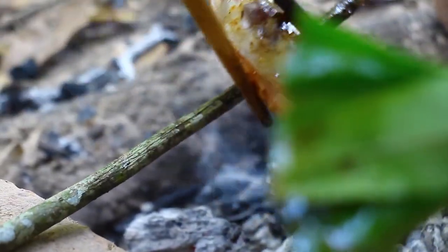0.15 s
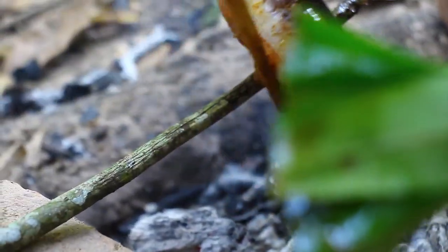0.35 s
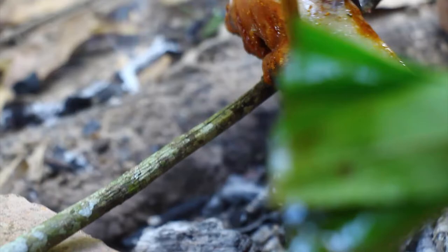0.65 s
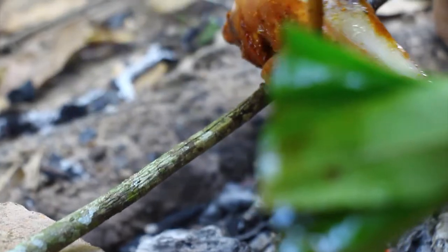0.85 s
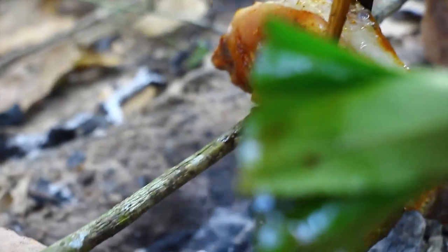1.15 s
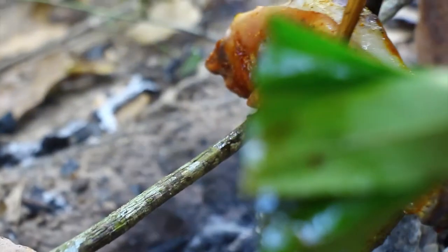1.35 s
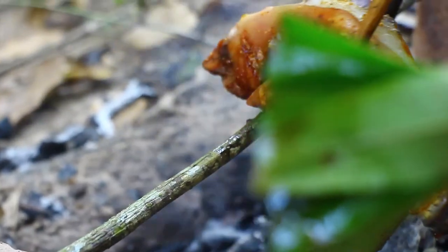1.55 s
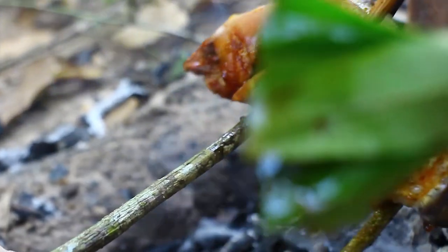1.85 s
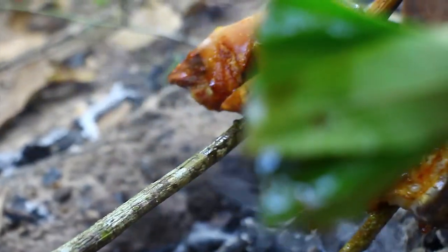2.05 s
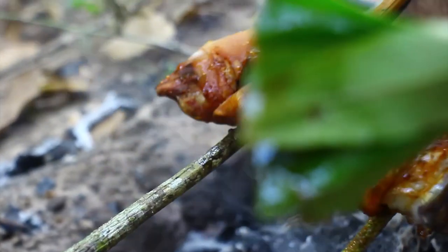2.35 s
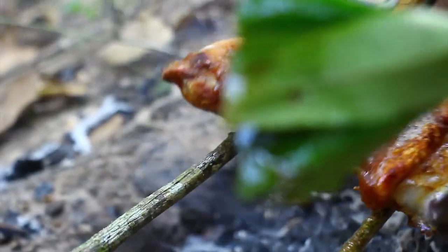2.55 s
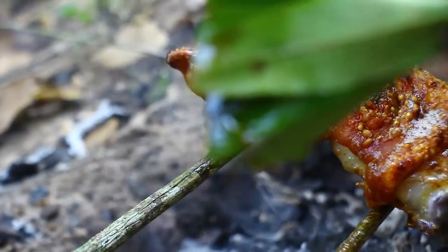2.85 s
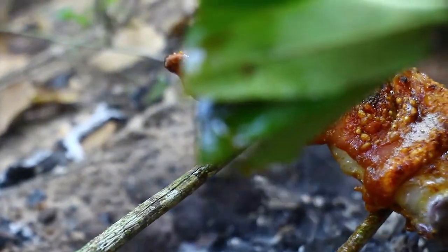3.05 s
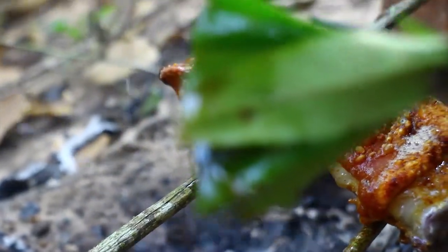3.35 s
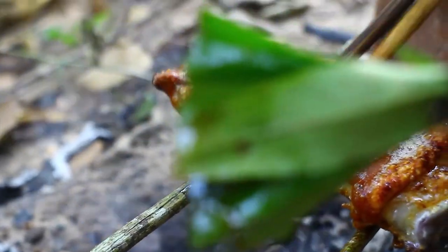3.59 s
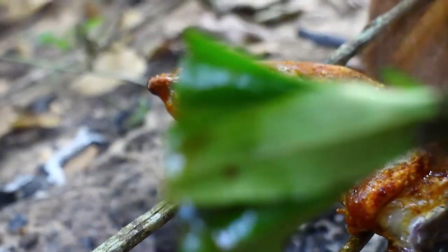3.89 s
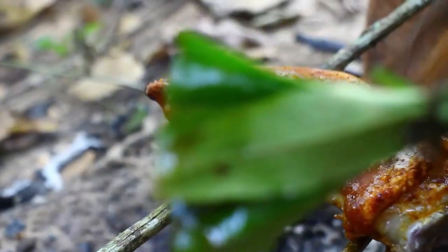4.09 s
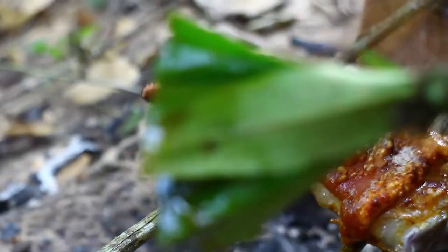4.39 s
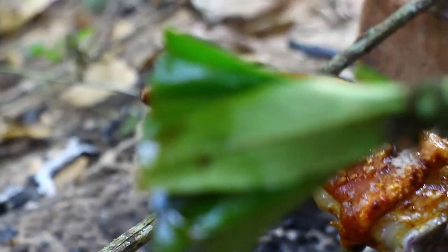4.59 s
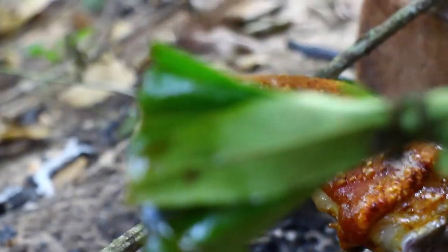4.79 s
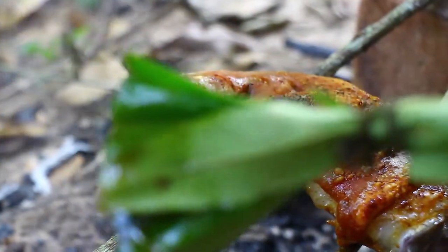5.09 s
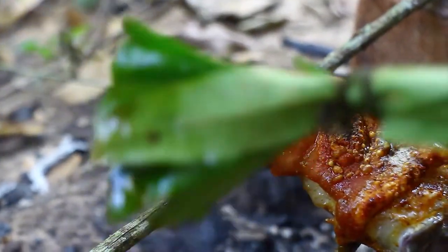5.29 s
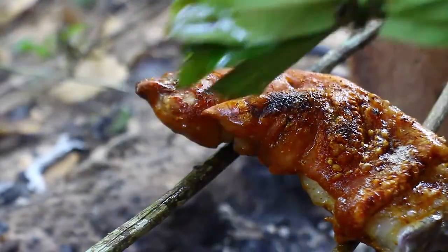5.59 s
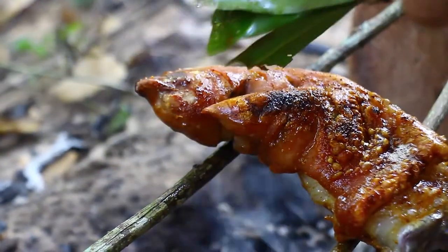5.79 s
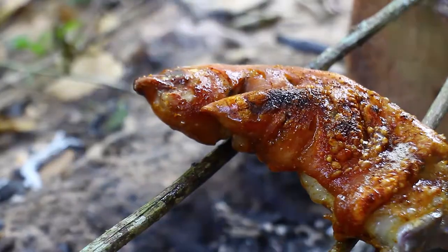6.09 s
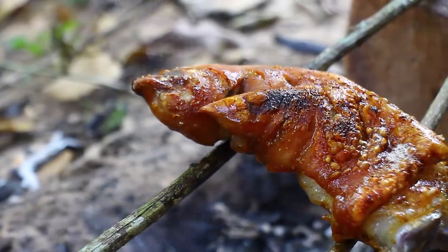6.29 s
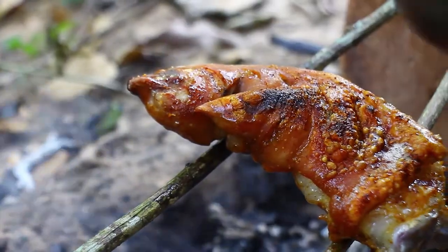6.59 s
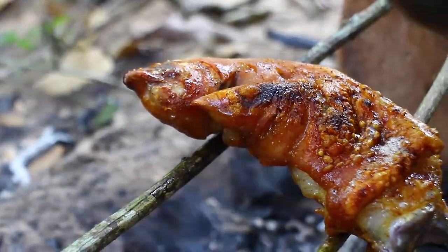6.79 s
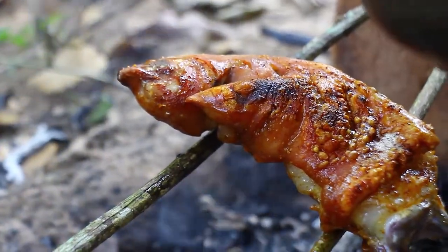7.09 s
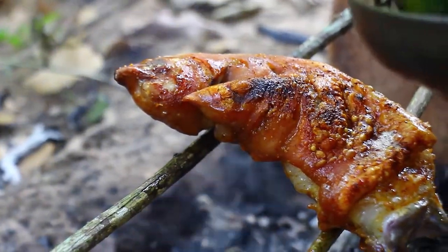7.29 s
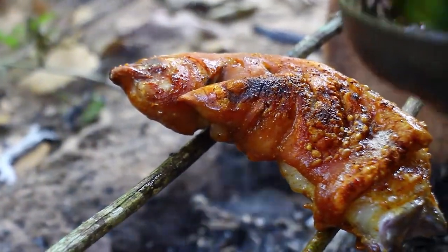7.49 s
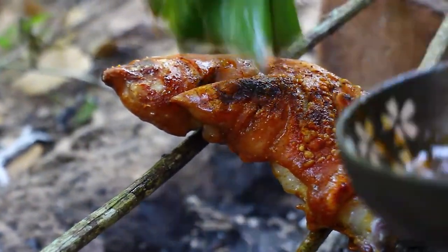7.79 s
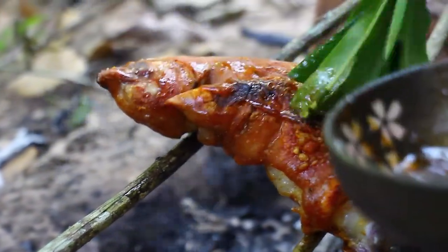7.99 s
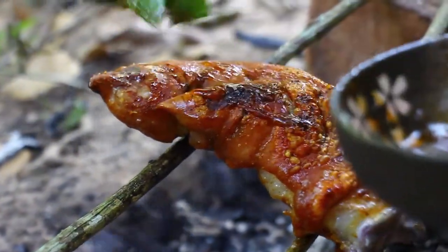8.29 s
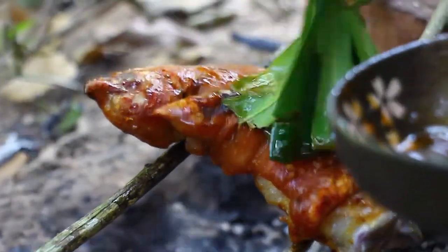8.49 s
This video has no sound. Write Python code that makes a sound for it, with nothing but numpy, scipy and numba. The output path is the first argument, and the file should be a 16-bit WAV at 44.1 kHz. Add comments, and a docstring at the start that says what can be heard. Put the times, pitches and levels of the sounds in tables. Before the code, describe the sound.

Close outdoor roasting: spitting fat and crackling embers, a cluster of sharp wooden knocks, a bowl tick, brief steam squeal, and wet leaf brushing.

```python
"""In a forest, meat sizzles on green sticks over wood embers, close to a small microphone.
Fat and sauce boil off as noise in spitting puffs; bubbles and embers crackle as rings and sprays of hiss.
Steam whistles twice through a crack as wavering tones; wet leaves brush the skin and stir the sauce bowl as
shaped noise. Wooden tongs knock a stick and a bowl, each a set of dying tones; soft, dull thumps go with the
handling and one knock. Underneath lies a soft noise bed of fire and forest."""
import sys
import numpy as np
from scipy import signal
from scipy.fft import rfft, irfft, next_fast_len
from scipy.io import wavfile
from scipy.ndimage import uniform_filter1d, map_coordinates
from numba import njit

SR = 44100
rng = np.random.default_rng(int(sys.argv[2]) if len(sys.argv) > 2 else 0)


def persist_wave(psi):
    """Save psi, clipped to +-1, as 16-bit WAV."""
    counts = np.round(np.clip(psi, -1, 1) * 32767).astype(np.int16)
    wavfile.write(sys.argv[1], SR, np.atleast_2d(counts).T)


N = 381465


def undb(db):
    """Turn decibels into a plain multiplier."""
    return 10 ** (np.asarray(db) / 20)


def level(x, db):
    """Scale a signal to an average (RMS) level."""
    return x * undb(db) / np.sqrt(np.mean(x ** 2))


def curve(s, v):
    """Draw straight lines between values v at times s, one point per sample."""
    return np.interp(np.arange(N) / SR, s, v)


def colour(x, table):
    """Shape a signal by (pitch_hz, level_db) points; white noise keeps its level."""
    hz, db = np.transpose(table)
    size = next_fast_len(N)
    f = np.maximum(np.arange(size // 2 + 1) * SR / size, 1)
    gain = level(undb(np.interp(np.log(f), np.log(hz), db)), 0)
    return irfft(rfft(x, size) * gain, size)[:N]


def walk(rate):
    """Random levels, each held for about 1 / rate seconds, then smoothed twice; their spread is near 1."""
    k = max(int(SR / rate), 2)
    steps = np.repeat(rng.standard_normal(N // k + 1), k)
    return 1.32 * uniform_filter1d(uniform_filter1d(steps, k), k)[:N]


@njit
def grains(n, start, step, fade, size):
    """Add up dying sine waves, each run until it has dropped by 60 dB."""
    y = np.zeros(n)
    for k in range(len(start)):
        turn = fade[k] * np.exp(1j * step[k])
        z = size[k] + 0j
        length = int(-np.log(1000) / np.log(fade[k]))
        for i in range(start[k], min(n, start[k] + length)):
            y[i] += z.imag
            z *= turn
    return y


def pop(s, db, hz, cycles, sign):
    """Dying rings, as of bursting bubbles: each drops by 60 dB in three times its cycle count."""
    hz = np.clip(hz, 100, .4 * SR)
    fade = np.exp(-np.log(1000) * hz / (3 * np.clip(cycles, .3, 30) * SR))
    start = np.clip(s * SR, 0, N - 1).astype(np.int64)
    return grains(N, start, 2 * np.pi * hz / SR, fade, sign * undb(db))


def tail(x, ms):
    """Envelope that jumps with each spike and dies away, to 37 % in the given time."""
    return signal.lfilter([1], [1, -np.exp(-1000 / (ms * SR))], x)


def puffs(count, spread_db, ms):
    """Sudden starts that die quickly; a few are larger than the rest, or smaller if the spread is negative."""
    u = rng.random((count, 2))
    size_db = spread_db * np.minimum(-np.log(1 - u[:, 1]), 3.5)
    spikes = np.bincount((u[:, 0] * N).astype(int), undb(size_db), N)
    return level(tail(spikes, ms), 0)


# Boiling over time: start_s, steam_db, top_db (fine top hiss)
BOIL = [(0.0, -46, -66), (0.35, -49.5, -53.5), (0.74, -41.5, -69), (1.25, -46.5, -59), (1.658, -50, -60),
        (2.65, -47.5, -64), (2.82, -43.5, -69), (3.09, -45, -51), (3.17, -50.5, -59), (3.35, -51, -81),
        (3.64, -48, -54), (3.81, -40, -53), (4.14, -52, -64), (6.17, -51.5, -66), (6.36, -53, -48.5),
        (6.72, -53, -62), (7.13, -46.5, -57), (7.78, -53, -75), (8.17, -49, -68), (8.31, -51.5, -72),
        (8.65, -61, -56)]
# Tone of the steam: pitch_hz, level_db (per Hz, relative)
STEAM = [(710, -34), (1200, -41), (1800, 3), (2090, -15), (2790, -3.5), (3270, -2.5), (3580, -3), (5140, 1),
         (11000, -11.5), (14300, -19.5), (22000, -120)]
# Tone of the low, wet splutter: pitch_hz, level_db (per Hz, relative)
SPLUTTER = [(88, -29), (150, -10), (368, -9.5), (631, -2.5), (925, -5), (1740, -4), (2090, -6.5),
            (3500, -11), (4550, -44), (7700, -120)]
# Tone of the fine top hiss: pitch_hz, level_db (per Hz, relative)
TOP = [(5000, -4), (8500, 3), (11000, -1), (14500, 0), (15500, -5), (16500, -18)]
# Tone of the scratchy surges: pitch_hz, level_db (per Hz, relative)
SCRATCH = [(880, -28), (1500, -9), (1860, 3), (2110, -26), (2400, -0.5), (4200, 1.5), (6000, -2),
           (9200, -9), (10500, -33), (22000, -120)]
# The splutter rises by a share of each dB of steam above its usual level
SPLUTTER_DB, SPLUTTER_FOLLOWS, USUAL_STEAM_DB = -51.5, 0.55, -46.5
SURGE_TOP_DB = -12  # top hiss of a surge, against its steam


def sizzle():
    """Steam, splutter and top hiss share the same spits; surges are a denser scratch; bubbles burst in both."""
    s, steam_db, top_db = np.transpose(BOIL)
    splutter_db = SPLUTTER_DB + SPLUTTER_FOLLOWS * (steam_db - USUAL_STEAM_DB)
    steam, splutter, top = (undb(curve(s, db)) for db in (steam_db, splutter_db, top_db))
    sweep, wet = surge()
    spray = sweep * undb(SURGE_TOP_DB)

    # steady boiling plus long and short spits
    long_spits = puffs(count=900, spread_db=3.0, ms=4.6)
    short_spits = puffs(count=2200, spread_db=5.0, ms=0.5)
    spit = level(0.53 + 0.42 * long_spits + 0.55 * short_spits, 0)
    rough = level(0.5 + 0.36 * puffs(count=2500, spread_db=5.0, ms=3.0), 0)

    layers = (
        (steam * spit, STEAM),
        (sweep * rough, SCRATCH),
        (np.hypot(splutter * spit, wet * rough), SPLUTTER),
        (np.hypot(top * spit, spray * rough), TOP),
    )
    out = 0
    for gain, tone in layers:
        flicker = undb(1.2 * walk(30))
        out = out + colour(rng.standard_normal(N) * gain * flicker, tone)
    return out + np.hypot(steam, sweep) * bubbles()


def bubbles():
    """Many small bubbles: fizz rings very briefly, and quieter blubs ring longer."""
    u = rng.random((2, 2600, 5)).transpose(0, 2, 1)  # per kind: time, size, pitch, ring length, sign
    size_db = np.minimum(-4.2 * np.log(1 - u[:, 1]), 11.5)
    at, sign = u[:, 0] * N / SR, np.sign(u[:, 4] - .5)
    fizz = pop(at[0], size_db[0] + 8.5, 1300 * 8 ** u[0, 2], 0.22 + 0.83 * u[0, 3], sign[0])
    blubs = pop(at[1], size_db[1] - 10, 800 * 10 ** u[1, 2], 3 + 9 * u[1, 3], sign[1])
    return fizz + blubs


# Surges as sauce hits the heat or wet leaves sweep the skin:
# start_s, swell_s, hold_s, fall_s, steam_db, wet_db (splutter, above the steam)
SURGES = [(0.446, 0.16, 0.08, .4, -47.5, -13), (3.648, 0.017, 0.094, 0.018, -45, 0),
          (3.844, 0.02, 0.19, 0.013, -50.5, 4), (4.559, 0.057, 0.016, 0.049, -37, -0.5),
          (5.286, 0.0053, 0.022, 0.01, -36.5, -0.5), (5.318, 0.016, 0.02, .025, -50.5, 3),
          (5.718, 0.015, 0.013, .01, -54, 5.5), (6.171, 0.0053, 0.016, 0.011, -53, -18),
          (6.412, 0.054, 0.0097, 0.0083, -45.5, -3), (6.586, 0.016, 0.036, 0.014, -47.5, -25),
          (6.842, 0.028, 0.011, 0.0075, -41.5, -18), (7.031, 0.0088, 0.12, .012, -50.5, 0.5),
          (7.177, 0.017, 0.084, .025, -47.5, 0.5), (7.923, 0.014, 0.064, 0.04, -43, -7),
          (7.97, 0.055, 0.042, .008, -40.5, -18), (8.161, 0.044, 0.025, .03, -40.5, -8.5),
          (8.214, 0.03, 0.046, 0.015, -36.5, -2.5), (8.529, 0.013, 0.048, 0.014, -43.5, -4),
          (8.596, 0.044, .04, .012, -42.5, -11)]


def surge():
    """Steam and splutter levels of all surges: each swells, holds and falls away; their powers add."""
    power = 0
    for s, swell, hold, fall, db, wet_db in SURGES:
        shape = curve(s + np.cumsum([0, swell, hold, fall]), [0, 1, 1, 0]) ** 2
        peak_power = undb(2 * np.array([[db], [db + wet_db]]))
        power = power + peak_power * shape
    return np.sqrt(power)


# Crackles, two of them long-ringing, faint chirps:
# start_s, level_db (before the ring and spray offsets), pitch_hz, ring_cycles
CRACKLES = [(0.175, -26, 4400, 2.2), (0.191, -21, 4250, 3), (0.269, -29, 1770, 2.4),
            (0.298, -21, 1240, 1.1), (0.422, -20.5, 3320, 2.4), (0.515, -22, 5000, 2),
            (0.602, -15, 3380, 1.9), (0.682, -11, 5160, 2), (0.728, -18, 4550, 2), (0.814, -20, 2970, 1.1),
            (0.848, -19, 1760, 1.1), (0.871, -17.5, 4650, 1.5), (0.991, -23.5, 2980, 3.6),
            (1.036, -21.5, 1820, 3.1), (1.046, -21, 5540, 1.5), (1.14, -20.5, 5570, 2.4),
            (1.289, -25, 5630, 2.9), (1.367, -28, 1650, 3.5), (1.447, -36, 1840, 1.1), (1.47, -23, 6500, 2),
            (1.495, -16.5, 4580, 1.2), (1.55, -23, 3600, 2.2), (1.641, -24, 6000, 2.2),
            (1.667, -19, 5500, 1.7), (1.707, -18, 1870, 1.2), (1.805, -25, 8000, 2.7),
            (1.834, -24.5, 4710, 1.9), (1.853, -18, 6500, 2), (1.862, -24, 6000, 2), (1.89, -19, 1050, 1.3),
            (1.899, -19, 5000, 1), (1.909, -23, 7000, 2), (1.934, -23, 5500, 1.5), (1.95, -20.5, 1700, 1.3),
            (1.96, -21, 6500, 2), (2.049, -21, 1560, 1.4), (2.071, -16.5, 5810, 3.9),
            (2.213, -21.5, 4000, 1.6), (2.328, -25, 1100, 1.5), (2.373, -17, 6640, 5.6),
            (2.517, -21, 5670, 2.4), (2.424, -19.5, 7000, 2.9), (2.836, -22, 1160, 7.6),
            (2.922, -34, 4500, 1.5), (3.136, -25.5, 800, 5.8), (3.205, -19, 3000, 1.3),
            (3.28, -22, 6650, 2.6), (3.315, -25, 1370, 0.91), (3.424, -18, 1220, 0.75),
            (3.815, -18, 1890, 1.6), (3.88, -17.5, 1770, 4.3), (3.553, -32, 7040, 2),
            (4.293, -23, 6080, 2.4), (4.354, -26, 3060, 2.4), (4.367, -14.5, 3100, 0.68),
            (4.446, -16, 5330, 2.4), (4.463, -23, 1620, 3.8), (4.71, -29, 5500, 2.7),
            (4.748, -18.5, 4520, 1), (4.909, -16, 1830, 1), (4.963, -21, 4970, 2.7),
            (4.978, -22, 6500, 2.4), (5.018, -27, 918, 0.32), (5.168, -25, 6500, 2.8),
            (5.215, -20.5, 6170, 4.5), (5.222, -18, 6350, 3.2), (5.291, -21.5, 1710, 9.4),
            (5.433, -30, 1210, 3.3), (5.447, -16, 960, 5), (5.503, -26, 5000, 1.7), (5.548, -30, 4990, 2.4),
            (5.615, -20.5, 5780, 2.6), (5.68, -26, 8000, 2), (5.743, -23, 9000, 2.2), (5.769, -30, 9000, 2),
            (5.79, -36, 4500, 1.5), (5.9025, -16.5, 9050, 2.7), (5.906, -28, 4600, 1.8),
            (5.935, -20.5, 3900, 1.4), (6.061, -21.5, 1660, 1.8), (6.087, -34.5, 2720, 27),
            (6.179, -29, 5270, 30), (6.215, -22, 3000, 0.96), (6.334, -22, 3060, 3.1),
            (6.344, -20, 5140, 2.4), (6.376, -21.5, 1560, 3.7), (6.421, -12.5, 926, 0.38),
            (6.444, -13.5, 2600, 1), (6.531, -21.5, 4730, 4.1), (6.607, -20, 6440, 6),
            (6.636, -22.5, 9000, 2), (6.835, -26.5, 915, 2.6), (7.043, -23.5, 1210, 6.4),
            (7.22, -25, 600, 2.6), (7.437, -18.5, 3240, 4.2), (7.533, -29, 3940, 18), (7.6, -14.5, 1490, 1),
            (7.708, -20, 1750, 2.2), (7.84, -19.5, 7000, 1.5), (7.937, -23.5, 1500, 4.2),
            (8.049, -21, 4390, 5.6), (8.068, -18, 4620, 2.9), (8.079, -14.5, 3860, 3.1),
            (8.101, -19, 5500, 2), (8.308, -19, 3240, 6.3), (8.397, -26, 9000, 1),
            (8.457, -27.5, 8900, 2.1), (8.472, -25, 7100, 1.5), (8.549, -20.5, 1330, 1.3)]
RING_DB, SPRAY_DB, SPRAY_MS = -4, -12.5, 1.64
# Low crackles spray mostly dull splutter, high ones bright hiss
DULL_HZ, BRIGHT_HZ, SPRAY_TOP_DB = 1160, 4370, -14


def crackles():
    """Each crackle: a ring, mostly short, and a spray of hiss, brighter for higher ones; two are faint chirps."""
    s, db, hz, cycles = np.transpose(CRACKLES)
    sign = rng.choice([-1., 1.], len(s))
    bright = np.clip(np.log(hz / DULL_HZ) / np.log(BRIGHT_HZ / DULL_HZ), 0.25, 1)

    def spray(share):
        """Burst envelopes for one share of the spray."""
        spikes = np.bincount((s * SR).astype(int), share * undb(db + SPRAY_DB), N)
        return tail(spikes, SPRAY_MS)

    hiss = colour(rng.standard_normal(N), STEAM)
    hiss = hiss + undb(SPRAY_TOP_DB) * colour(rng.standard_normal(N), TOP)
    dull = undb(1) * colour(rng.standard_normal(N), SPLUTTER)
    rings = pop(s, db + RING_DB, hz, cycles, sign)
    return rings + spray(bright) * hiss + spray(1 - bright) * dull


# The sizzle also comes back off the broad leaf held beside the meat:
# start_s, extra_path_m, share (of the direct sound, 0-1)
LEAF_ECHO = [(0, 0.46, 0.054), (.7, 0.47, 0.16), (2.9, 0.414, 0.04), (8.65, 0.44, 0.055)]


def echo(x):
    """Add the copy that took the longer way at 343 m/s, keeping the power about the same."""
    s, metres, share = np.transpose(LEAF_ECHO)
    delay = curve(s, metres) / 343 * SR  # in samples
    late = map_coordinates(x, [np.arange(N) - delay], mode="mirror")
    loudness = curve(s, share)
    return (x + loudness * late) / np.hypot(1, loudness)


# Knocks of the tongs, most with a bounce:
# start_s, peak_db (of the ring), bowl_share (0-1), pitch_hz (favoured by the place of the blow)
KNOCKS = [(3.3745, -19, .9, 4170), (3.6458, -12, .25, 2980), (3.6519, -7.5, 0, 1850),
          (3.8446, -5, .03, 1200), (3.8471, -6, .1, 2700), (4.0392, -1.5, .02, 1850),
          (4.0465, -21, .02, 1850), (4.2273, -23, 0, 600), (4.2279, -14, .03, 1850),
          (4.2284, -11, .03, 1850), (4.4099, -6, .03, 2700), (4.4107, 0, .03, 1200),
          (4.4225, -25, .03, 1200), (4.7879, -17, .1, 5870), (4.78858, -14, .1, 4150),
          (4.78925, -15, .1, 4150), (4.7899, -15, 0, 600), (5.3992, -28, .6, 4170), (5.4069, -4, 1, 7500),
          (5.40722, -6, 1, 4170)]
# Tones of the wooden stick: pitch_hz, level_db (relative), t60_s (time to drop by 60 dB)
STICK = [(240, 10, .025), (600, -3, .022), (1160, -3, .010), (1500, -8, .006), (1820, -4, .010),
         (2400, -2, .005), (2980, -3, .008), (3540, -7, .006), (4150, -5, .006), (4800, -10, .004),
         (5870, -10, .013), (7800, -11, .007), (12200, -20, .003)]
# Tones of the bowl: pitch_hz, level_db (relative), t60_s (time to drop by 60 dB)
BOWL = [(1755, -16, .012), (3042, -8, .024), (4170, -5, .008), (5620, -12, .010), (6300, -1, .006),
        (7200, -2, .004), (8400, -2, .006), (10050, -13, .008), (12800, -5, .004)]
STICK_CONTACT_MS, BOWL_CONTACT_MS = 0.12, .04  # the harder bowl throws the tongs off sooner
FAVOUR_DB, FAVOUR_OCTAVES = 6, .22  # boost near the favoured pitch, and how far it reaches


def knocks():
    """Each blow pushes stick and bowl with a pulse set by the contact time; grit rattles after it."""
    out, spikes = np.zeros(N), np.zeros((2, N))
    t = np.arange(SR // 20) / SR
    thin = signal.butter(3, 1000, "high", fs=SR, output="sos")  # thin wood gives off little bass
    for s, db, bowl, favoured_hz in KNOCKS:
        i, ring = int(s * SR), 0
        for share, modes in ((1 - bowl, STICK), (bowl, BOWL)):
            hz, mode_db, t60 = np.transpose(modes)[:, :, None]
            spot = rng.standard_normal((2, len(modes), 1))  # the place of the blow shifts each tone a little
            wave = np.sin(2 * np.pi * hz * (1 + .012 * spot[0]) * t) * np.exp(-np.log(1000) * t / t60)
            nearness = np.exp(-(np.log2(hz / favoured_hz) / FAVOUR_OCTAVES) ** 2)
            mode_db = mode_db + FAVOUR_DB * nearness + 1.5 * spot[1]
            ring = ring + share * (undb(mode_db) * wave).sum(axis=0)
        contact_ms = (1 - bowl) * STICK_CONTACT_MS + bowl * BOWL_CONTACT_MS
        pulse = np.hanning(int(contact_ms * SR / 1000) + 3)
        ring = signal.sosfilt(thin, np.convolve(ring, pulse)[:len(t)])
        out[i:i + len(t)] += undb(db) * ring / np.abs(ring).max()
        spikes[:, i] = undb(db) * np.array([1 - bowl, 1])  # grit lies on the stick

    grit_band = signal.butter(2, [700, 5000], "band", fs=SR, output="sos")
    crack_band = signal.butter(2, [5000, 11000], "band", fs=SR, output="sos")
    grit = signal.sosfilt(grit_band, rng.standard_normal(N)) * tail(spikes[0], 2.95)
    crack = signal.sosfilt(crack_band, rng.standard_normal(N)) * tail(spikes[1], 0.99)
    return out + undb(-11.5) * grit + undb(-24.5) * crack


# Two steam whistles, each a list of: start_s, pitch_hz, level_db, waver (share of pitch)
WHISTLES = [
    [(1.93, 4550, -56, .001), (2.11, 4090, -57, .001), (2.2, 4010, -55, .001), (2.5, 3940, -55, .001),
     (2.76, 3890, -57, .002)],
    [(5.51, 4350, -52, .003), (5.537, 4950, -46, .015), (5.58, 5150, -50, .03), (5.622, 5800, -45, .035),
     (5.645, 6400, -47, .08), (5.66, 5900, -46, .15), (5.76, 5700, -56, .18)],
]


def whistles():
    """Steam forced through a crack: a tone that breaks into hiss as its pitch wavers more."""
    out = 0
    for table in WHISTLES:
        s, hz, db, waver = np.transpose(table)
        gate = curve([s[0] - .015, s[0], s[-1], s[-1] + 0.015], [0, 1, 1, 0])
        pitch = curve(s, hz) * (1 + curve(s, waver) * walk(3500))
        tone = np.sin(2 * np.pi * np.cumsum(pitch) / SR)
        out = out + gate * undb(curve(s, db) + 1.3 * walk(60)) * tone
    return out


# The leaf brush stirs the sauce bowl: start_s, hum_db (hollow hum of its air), rub_db (on its wall)
STIR = [(7.02, -75, -75), (7.05, -62, -59), (7.16, -61, -74), (7.2, -63, -34.5), (7.25, -44, -66),
        (7.32, -67, -62), (7.42, -52, -46.5), (7.5, -54, -50.5), (7.6, -54, -82), (7.68, -77, -75)]
# Rubbing tones of the wall: pitch_hz, width_hz, level_db (relative)
RUB = [(3200, 600, 0), (4300, 800, 3)]
BOWL_AIR_HZ, BOWL_AIR_WIDTH_HZ = 1106, 45


def stir():
    """Wet leaves scrape the bowl in small slips; its air hums and its wall hisses."""
    s, hum_db, rub_db = np.transpose(STIR)
    inside = curve([s[0], s[0] + .01, s[-1] - .01, s[-1]], [0, 1, 1, 0])
    air = rng.standard_normal(N)
    slips = air * (0.52 + 0.46 * puffs(count=900, spread_db=-9.0, ms=5.4))

    def ring(x, hz, width_hz):
        """Let only a narrow band around one pitch through."""
        return level(signal.lfilter(*signal.iirpeak(hz, hz / width_hz, SR), x), 0)

    rub = level(sum(undb(db) * ring(slips, hz, width_hz) for hz, width_hz, db in RUB), 0)
    hum = ring(air, BOWL_AIR_HZ, BOWL_AIR_WIDTH_HZ)
    return inside * (undb(curve(s, hum_db)) * hum + undb(curve(s, rub_db)) * rub)


# Soft thumps under the handling, and the low tone of the stick knock at 4.79 s:
# start_s, level_db (before a slight cut), pitch_hz
THUMPS = [(1.884, -38, 325), (3.646, -41, 218), (4.227, -35, 277), (5.298, -38, 223), (5.724, -41, 168),
          (7.078, -39, 198), (4.789, -28, 597)]
THUMP_CYCLES = 4.2  # a thump drops by 60 dB in three times this many cycles


def thumps():
    """Each thump or low knock tone: a dull, quickly dying ring."""
    s, db, hz = np.transpose(THUMPS)
    return pop(s, db, hz, np.full(len(s), THUMP_CYCLES), 0.84)  # 0.84 is the slight cut


# Tone of the fire and forest: pitch_hz, level_db (per Hz, relative)
BED = [(15, -44), (25, -6.5), (97, 7.5), (202, 3.5), (273, 10), (421, -0.5), (568, 9), (978, -1.5),
       (1120, 6), (1780, -4.5), (2530, -1), (5130, -19.5), (7500, -6), (14400, -75), (16500, -60)]
BED_DB = -53  # average level before the slow drift


def bed():
    """Low flutter of the fire and far forest hiss: shaped noise whose level drifts slightly."""
    noise = level(colour(rng.standard_normal(N), BED), BED_DB)
    return noise * undb(0.13 * walk(2.87))


def scene():
    """Mix all sources; the crackles and the sizzle are small and give off no bass."""
    pops = signal.sosfilt(signal.butter(2, 600, "high", fs=SR, output="sos"), crackles())
    fire = signal.sosfilt(signal.butter(2, 180, "high", fs=SR, output="sos"), sizzle())
    return (echo(pops + fire) + knocks() + whistles() + stir() + thumps() + bed())[None, :]


TOP_HZ = 15800  # highest pitch the recorder keeps


def record(dry):
    """The recorder clips at full scale, then cuts the top."""
    low_pass = signal.ellip(8, .2, 70, TOP_HZ, fs=SR, output="sos")
    return signal.sosfilt(low_pass, np.clip(dry, -1, 1))


dry = scene()
out = record(dry)
persist_wave(out)
```